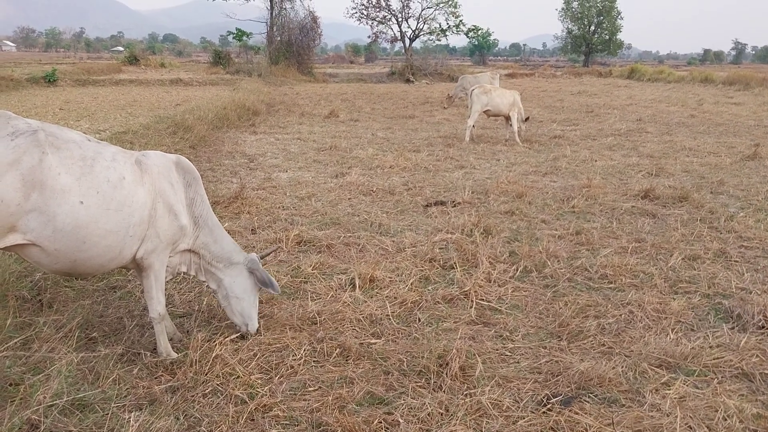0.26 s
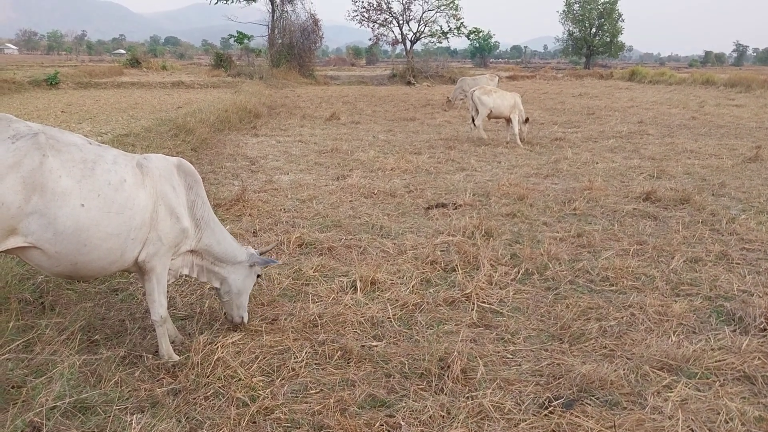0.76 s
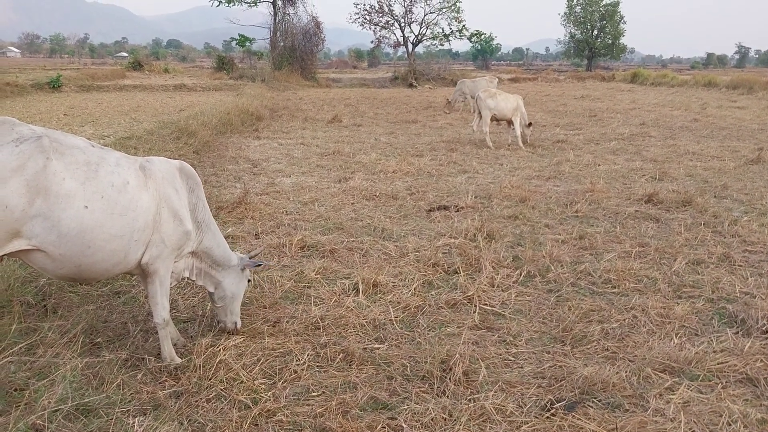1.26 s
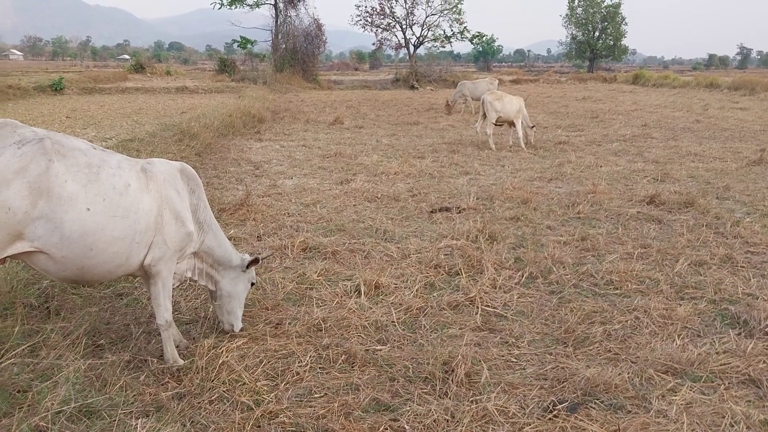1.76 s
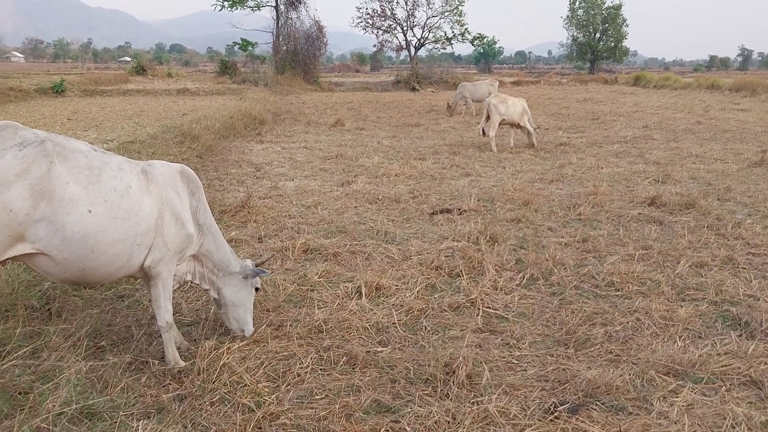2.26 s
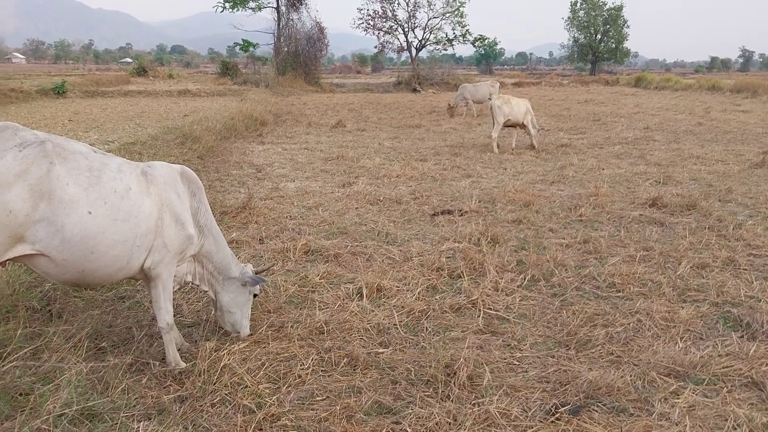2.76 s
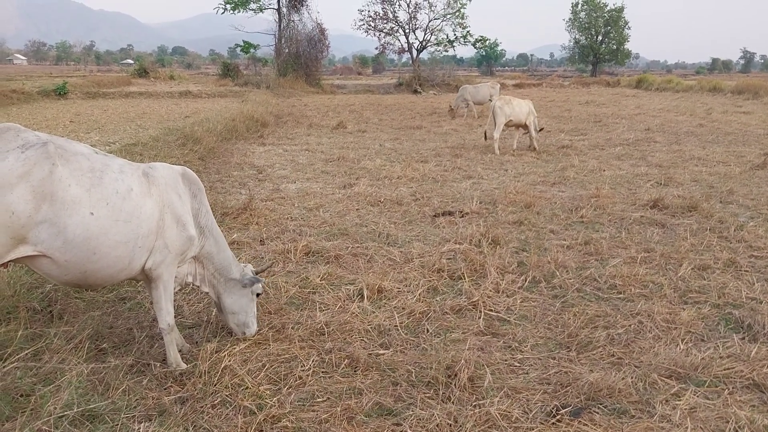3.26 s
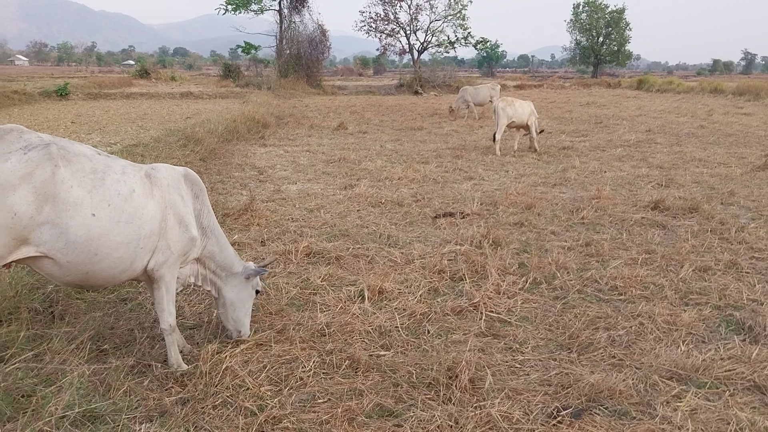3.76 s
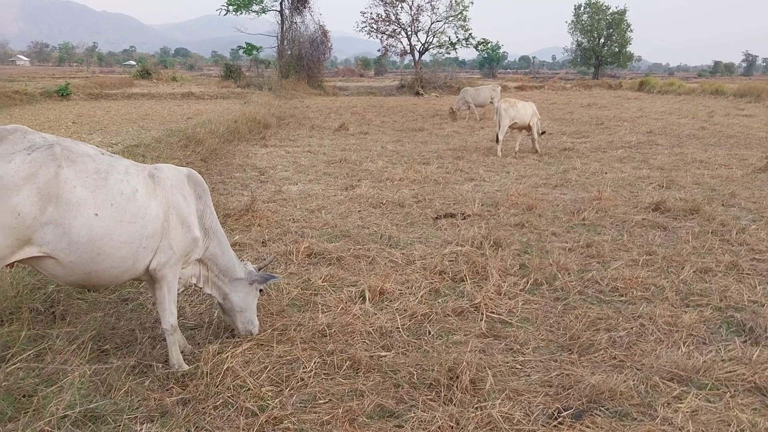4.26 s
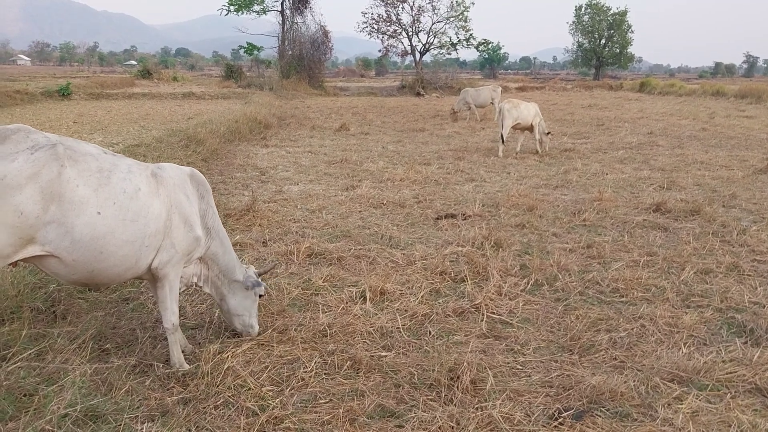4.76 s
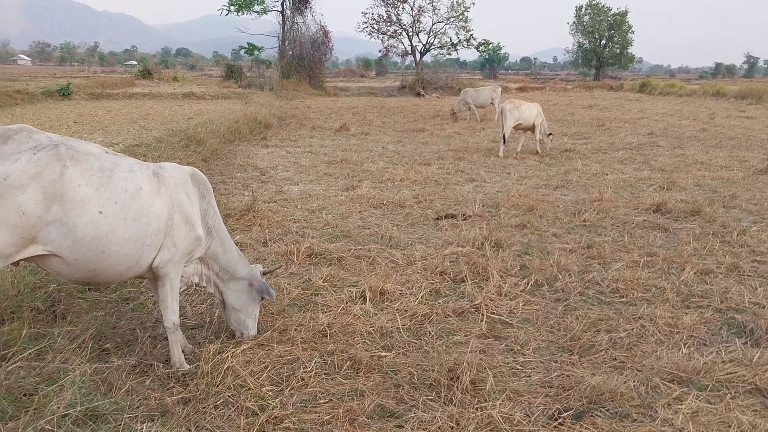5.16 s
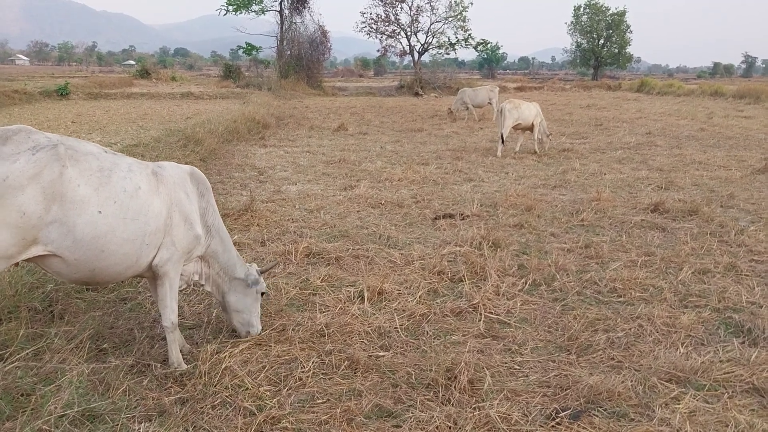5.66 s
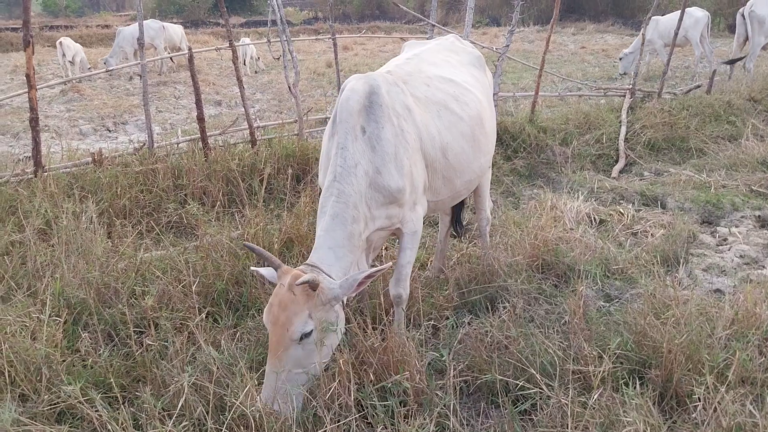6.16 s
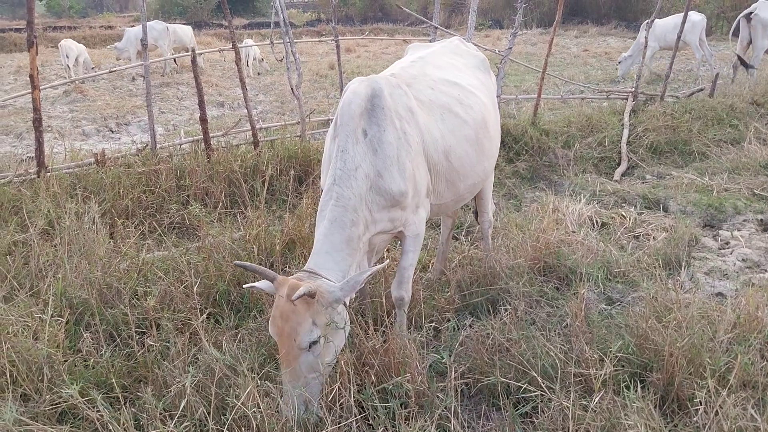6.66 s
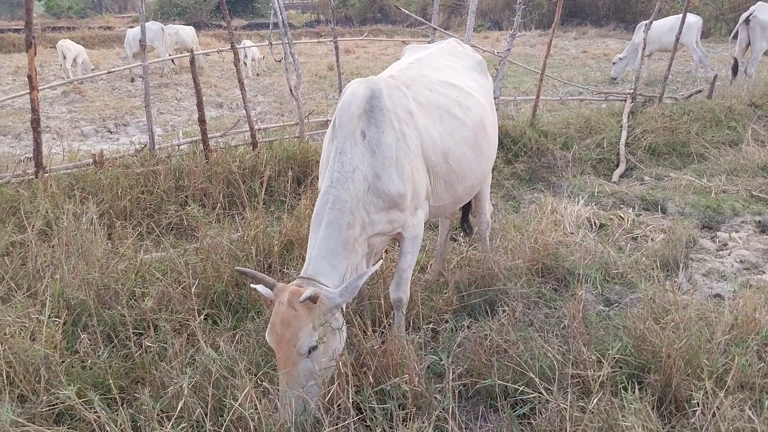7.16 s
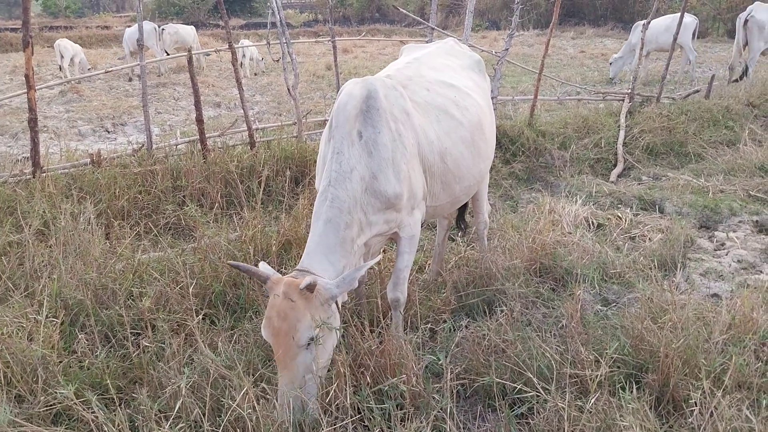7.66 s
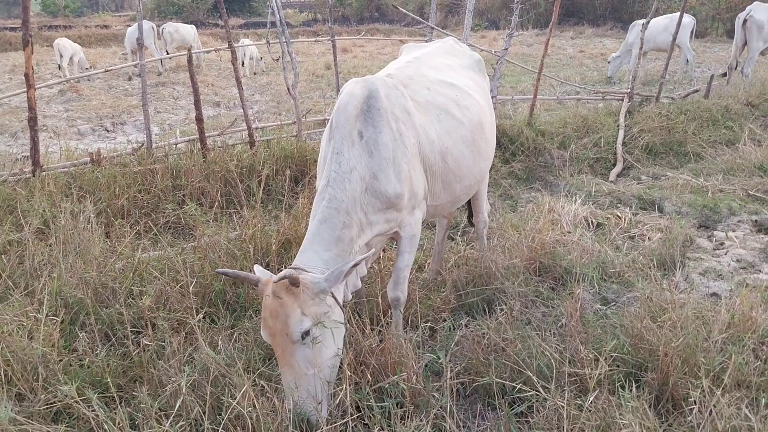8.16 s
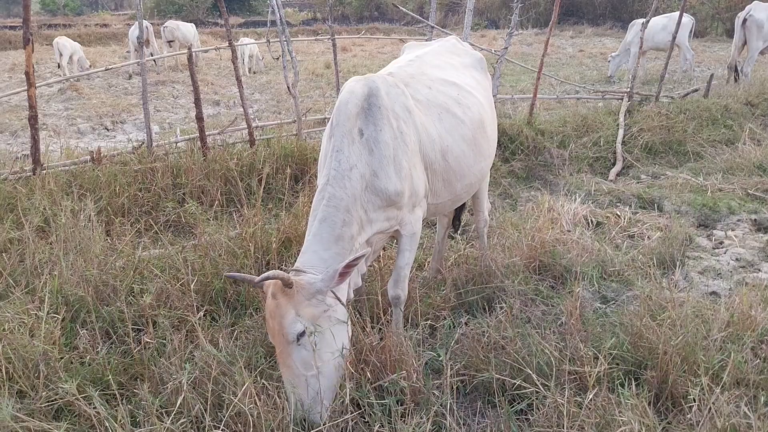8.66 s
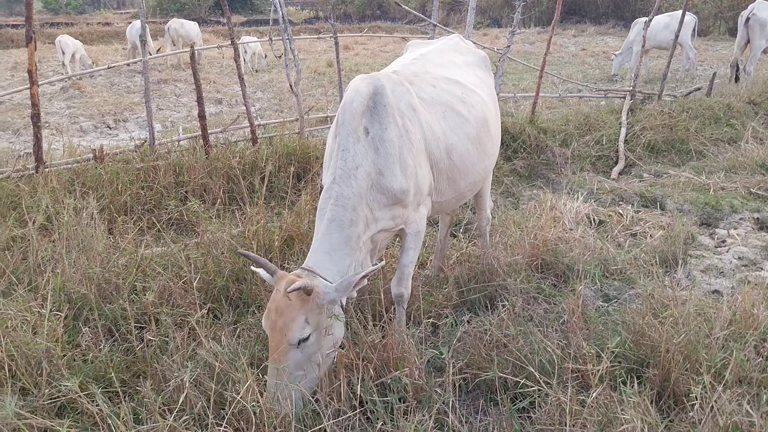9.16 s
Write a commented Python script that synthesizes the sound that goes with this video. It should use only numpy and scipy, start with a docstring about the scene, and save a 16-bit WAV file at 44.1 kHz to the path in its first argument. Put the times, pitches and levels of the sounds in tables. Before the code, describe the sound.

Gusty low wind blows across a handheld stereo microphone for the first six seconds, half covering a cow's faint tugs at dry stalks, small bell clanks and far bird whistles. Then the wind abruptly drops away; ripping tufts, dry rustle, sharp twiggy snaps and a tinny neck bell come close and clear, with a few late bird notes.

```python
"""Grazing cow in wind

A cow grazes dry grass near a phone: jaws tear tufts (runs of fibre breaks ringing in the muzzle), stalks
rustle (hiss and grains) and snap (decaying splinter noise), a sheet-metal neck bell clanks (struck modes).
Wind buffets both ports (gusted noise, low thumps); a far bird whistles falling notes (pitch-swept sines).
Grazing is first some steps away in the open; after a cut at 5.81 s it is close by, in calmer air.
"""
import sys
import numpy as np
from scipy import signal
from scipy.fft import rfft, irfft, next_fast_len
from scipy.io import wavfile
from scipy.ndimage import uniform_filter1d, map_coordinates

SR = 44100
rng = np.random.default_rng(int(sys.argv[2]) if len(sys.argv) > 2 else 0)


def dump_mix(stems):
    """Bounce the given channels to the path in sys.argv[1] as a 16-bit WAV at rate SR."""
    frames = np.atleast_2d(stems).T  # one column per channel
    limited = np.clip(frames, -1, 1)  # hard clip at full scale
    pcm = np.round(limited * 32767).astype(np.int16)
    wavfile.write(sys.argv[1], SR, pcm)


N = 414981

# All table levels are relative: layer gains follow.
# Open-field wind strength: t/s, level/dB
OPEN_WIND = [(0.0, -37.5), (0.04, -36), (0.12, -38.5), (0.24, -50), (0.28, -40), (0.35, -38.5), (0.39, -49),
             (0.46, -49), (0.51, -31), (0.55, -36), (0.6, -30), (0.66, -40), (0.8, -43), (0.88, -37),
             (0.96, -46), (1.02, -44.5), (1.1, -34), (1.17, -27.5), (1.22, -37), (1.3, -36), (1.41, -34.5),
             (1.5, -27.5), (1.55, -35), (1.64, -31), (1.8, -36), (2.0, -40), (2.06, -37), (2.16, -47),
             (2.21, -34.5), (2.3, -42), (2.39, -33), (2.42, -25), (2.52, -30), (2.55, -28.5), (2.63, -45),
             (2.75, -46), (2.9, -42), (2.98, -46), (3.06, -36), (3.15, -43), (3.25, -38), (3.35, -43),
             (3.57, -33.5), (3.77, -49), (3.82, -38), (3.88, -36), (3.94, -29), (4.05, -29), (4.17, -44),
             (4.23, -38), (4.28, -34), (4.42, -53), (4.52, -35), (4.6, -44), (4.7, -48), (4.79, -40),
             (4.85, -51), (4.9, -47), (4.96, -57), (5.04, -40), (5.18, -39), (5.25, -51), (5.29, -42),
             (5.37, -55), (5.43, -45), (5.48, -52), (5.58, -38.5), (5.66, -42.5), (5.73, -48), (5.8, -39),
             (5.84, -80.5)]
# Hardest eddies: t/s, peak level/dB, upper edge f/Hz
HARD_EDDIES = [(1.157, -17, 238), (1.356, -21.5, 226), (1.45, -21.5, 512), (1.501, -18, 600),
               (1.655, -23, 382), (2.415, -17.5, 520), (2.474, -17.5, 400), (2.540, -7.5, 255),
               (3.003, -29, 420), (3.295, -29, 620), (3.965, -11, 325), (4.031, -18, 300),
               (4.062, -15, 402), (4.53, -25, 248), (5.120, -20, 257), (5.798, -27.5, 335),
               (7.405, -32.5, 276), (7.466, -34, 336)]
# Muzzle pushing through stalks: t/s, rustle level/dB
RUSTLE_LEVEL = [(0, -58), (.3, -55.5), (.95, -57), (2.28, -55), (3.38, -57.5), (3.8, -54.5), (4.4, -60.5),
                (5.13, -57.5), (5.76, -59.5), (5.88, -52), (6.75, -59.5), (7.1, -55.5), (7.8, -57.5),
                (8.62, -56.5), (8.96, -48.5), (9.35, -57.5)]
# Tufts torn off: t/s, peak level/dB, brightness/(dB/octave)
TUFT_TEARS = [(0.474, -41.5, 1.5), (0.627, -33.5, -12), (0.805, -38, 7), (1.018, -41, -1.5),
              (1.649, -38.5, -18), (2.531, -31.5, -4.5), (2.721, -38.5, -2), (2.874, -42, 5),
              (3.656, -42, 12), (4.109, -42, 1.5), (4.309, -40.5, -9), (4.768, -40, -6), (4.88, -39, 5),
              (4.917, -42, 3), (5.008, -43, 0), (5.046, -36, -3), (5.279, -38.5, -1), (5.812, -40, -3),
              (5.972, -28, 6), (6.022, -40.5, 5), (6.137, -31, 5.5), (6.157, -33, 0), (6.178, -31, 1),
              (6.354, -41, 7), (6.376, -28.5, 3.5), (6.385, -29.5, 2), (6.534, -35.5, -1), (6.557, -31, 2),
              (6.857, -48, 8), (7.072, -40, 0), (7.112, -43, 0.5), (7.296, -31.5, 5.5), (7.4, -38.5, -1.5),
              (7.461, -39, -15), (7.644, -49, 6.5), (7.903, -37.5, 4), (7.938, -32, 2), (8.395, -48, 3.5),
              (8.574, -47, 10), (8.709, -34, 4), (8.743, -38.5, -1), (8.874, -35, 7.5), (8.898, -31, 2),
              (8.945, -38.5, 7), (9.344, -46.5, 2.5)]
# Dry stalks breaking: t/s, peak level/dB
STALK_SNAPS = [(0.3252, -28.5), (3.6697, -29), (5.8082, -26.5), (5.8787, -25.5), (6.2064, -31),
               (6.4103, -35), (6.5883, -29), (6.609, -27), (7.028, -33), (7.164, -36), (7.219, -34),
               (7.402, -32), (7.463, -21), (8.84, -30), (8.863, -39), (8.888, -25), (8.955, -29),
               (9.013, -32.5), (9.203, -33)]
# Clapper blows: t/s, hum level/dB, main ring level/dB, other modes level/dB, favoured modes level/dB,
# then modes favoured by the contact spot, f/Hz, strongest first
CLAPPER_BLOWS = [(0.062, -52, -49, -57, -46, 6153, 5067, 3429, 5460),
                 (0.291, -52, -48, -54, -47, 6153, 5067, 3429, 10875),
                 (0.585, -54, -59, -61, -52, 6319, 4078), (0.823, -49, -49, -58, -53, 3015, 5460),
                 (1.094, -62, -51, -59, -54, 5460, 3603, 6153),
                 (1.221, -45.5, -41, -44, -32, 6153, 5460, 9598, 5067, 10875, 6319),
                 (1.283, -56, -49, -51, -38, 3603, 3429, 5067, 3015),
                 (1.388, -64, -51, -57, -49, 6319, 3882), (2.316, -65, -57, -57, -50, 5460, 6153),
                 (2.552, -65, -56, -56, -45.5, 5067, 6319, 5202), (2.787, -67, -60, -62, -52, 6319, 4078),
                 (3.466, -73, -56, -56, -45.5, 6153, 5460, 5067),
                 (3.667, -75.5, -52, -56.5, -46, 2425, 2635, 6319),
                 (3.897, -72, -55, -56, -46, 6319, 5067, 6153, 3429),
                 (4.532, -57, -48, -54, -42.5, 6319, 5460), (4.706, -54, -37.5, -49, -35, 6319, 3882, 5202),
                 (4.964, -52.5, -50.5, -58, -52.5, 6153, 5067, 7034),
                 (5.764, -59, -57, -58, -47.5, 6319, 6153), (5.9, -62, -48, -60, -55, 5202),
                 (6.487, -42.5, -32, -41, -36.5, 6153, 4078, 5202, 6319, 3882, 12965),
                 (6.936, -52, -41.5, -51, -39, 6153, 5460, 10875, 4078, 5202),
                 (7.323, -42, -38.5, -37.5, -33, 6153, 10875, 5067, 5460, 12965, 7811),
                 (8.871, -48, -35, -38.5, -29.5, 10970, 6153, 5202, 7034, 14410, 5460),
                 (8.925, -43, -37.5, -39.5, -31.5, 6153, 5460, 3603, 10875, 3882),
                 (9.384, -39.5, -50, -39, -27.5, 7034, 6319, 5460)]
# Bell falls against the dewlap and is choked: t/s
DEWLAP_CHOKES = [1.0, 1.55, 2.85, 3.55, 4.0, 5.35, 6.05, 6.99, 7.36, 9.16]
# Bell shell modes: f/Hz, level within hum or clang/dB, t60/s
BELL_MODES = [(1001, -10, .6), (1074, 0, 1.8), (2380, -15, .2), (2425, -7, .2), (2635, -7, .18),
              (2909, -4, .38), (3015, -3, .13), (3429, -6, .28), (3603, -9, .17), (3882, -5, .16),
              (4078, -8, .22), (5067, -5, .21), (5202, -10, .2), (5460, -8, .17), (6153, -6, .19),
              (6319, -5, .2), (7034, -11, .18), (7811, -11, .17), (8872, -8, .16), (9190, -8, .16),
              (9598, -7, .16), (10875, -3, .16), (10970, -4, .14), (12550, -8, .13), (12965, -4, .18),
              (13520, -11, .13), (14410, -9, .17), (14800, -7, .12), (15400, -8, .12)]
# Resonances of mouth and muzzle: f/Hz, width/Hz, level/dB
MUZZLE_MODES = [(752, 101, 2.5), (854.5, 62, 5), (1167, 45, -5), (1272, 34, -2.5), (1815, 55, -2.5),
                (2383, 75, -0.5), (2630, 170, -14), (3085, 140, -13), (3980, 140, -18), (4506, 130, -14),
                (5400, 200, -24)]
# Bird whistles: t/s, length/s, start f/Hz, end f/Hz, lateness of fall (1 = even), hoarseness (0-1), level/dB
BIRD_NOTES = [(.21, .15, 2150, 1945, 1.2, .04, -57.5), (.47, .15, 2305, 2070, 1.2, .04, -51.5),
              (.58, .15, 2360, 2070, 1.2, .04, -55.5), (.63, .15, 2550, 2200, 1.2, .15, -65),
              (1.6, .14, 2424, 2120, 1, .03, -52), (1.735, .135, 2170, 1910, 1.1, .03, -55),
              (2.299, .15, 2920, 2530, 1.2, .8, -58), (3.14, .15, 3300, 2810, 1.2, 1, -62),
              (3.268, .125, 2360, 2260, 2.5, .03, -53), (3.43, .18, 2180, 1900, 1.5, .03, -50),
              (4.4, .13, 2620, 2320, 1.2, .03, -56), (4.44, .08, 5100, 4550, 1, .03, -63),
              (4.995, .15, 2710, 2380, 1.2, .3, -57), (5.47, .15, 2290, 1920, 1.2, .04, -60.5),
              (7.975, .12, 2385, 2240, 7, .03, -48.5), (8.11, .13, 3480, 3000, 1.2, 1, -64),
              (8.23, .11, 2560, 2320, 1.2, .8, -54), (8.44, .15, 4000, 3650, 1.2, 1, -66),
              (8.59, .15, 2670, 2560, 1.2, .4, -57)]
# Spectrum of strong-wind rumble: f/Hz, level/dB
RUMBLE_SPECTRUM = [(15, -46), (30, -8.5), (60, -1), (105, 3.5), (190, -0.5), (260, -12.5), (400, -51),
                   (700, -73)]
# Spectrum of light-air rumble: f/Hz, level/dB
LULL_SPECTRUM = [(15, -10), (30, -14), (60, 1.5), (105, 0), (150, -12.5), (220, -15.5), (400, -33),
                 (700, -68)]
# Spectrum of higher wind flutter: f/Hz, level/dB
FLUTTER_SPECTRUM = [(100, -12.5), (180, 1), (245, 3), (370, -3), (530, -14.5), (690, -25.5), (900, -31),
                    (1300, -62.5), (3000, -100)]
# Spectrum of rubbing straw: f/Hz, level/dB
STRAW_SPECTRUM = [(300, -4), (1000, -26), (2000, -21.5), (3400, -6), (5500, -1.5), (7400, -3), (8300, -4.5),
                  (10000, -2.5), (11300, 2.5), (13000, 1), (15800, -1)]
# Spectrum of steady field air: f/Hz, level/dB
FIELD_SPECTRUM = [(20, 4), (70, -9.5), (200, -20.5), (500, -0.5), (1000, -2), (2300, 5), (4000, -3.5),
                  (9000, -16), (16000, -29)]
# Spectrum of fibre crackle: f/Hz, level/dB
CRACKLE_SPECTRUM = [(250, -28), (600, -3.5), (3200, 2.5), (5400, -4.5), (7000, -18), (15000, -20)]
# Side the wind strikes: t/s, left minus right level/dB
WINDWARD_SIDE = [(0, 11.5), (.6, 1.5), (1.7, 12.5), (2.5, 3.5), (3.3, 12), (4.06, 4), (4.9, 11), (6.4, 5),
                 (8.9, -10)]
# Flutter over rumble at usual strength: t/s, level/dB
FLUTTER_RATIO = [(0, -2.5), (.35, -11.5), (.6, -9), (1.0, -11), (1.85, 5.5), (2.2, -9.5), (2.8, -7.5),
                 (3.2, 7), (3.55, -3.5), (4.0, -1.5), (4.85, -5.5), (5.7, 6), (6.0, -15)]
# Puffs reaching the shelter: peak t/s, length/s, level/dB
SHELTER_PUFFS = [(6.1, 0.14, -51), (6.561, 0.11, -50), (6.89, 0.054, -56.5), (7.032, 0.093, -44.5),
                 (7.456, 0.16, -45.5), (7.759, 0.07, -47.5), (8.294, 0.14, -42.5), (8.738, 0.079, -44),
                 (8.898, 0.11, -44), (9.284, 0.16, -64)]

CLOSE_S = 5.81  # cut from the open field to close, sheltered grazing
TOP_HZ = 15900
USUAL_WIND_DB, FLUTTER_DB_PER_DB = -39, .35  # usual strength; flutter growth per dB above it
CALM_DB, PUFF_EDGE_DB = -79.5, 10  # air between puffs; drop from a puff's peak to its ends
NIBBLES_PER_S, NIBBLE_DB, NIBBLE_BRIGHT_DB_PER_OCT = 3, -55, 0.5  # faint tugs at random times
TWIGS_PER_S, TWIG_DB = 2, -54  # fainter snaps, close by only
RING_HZ, HUM_BELOW_HZ, HUM_SWELL_S = 2909, 1500, 0.01
LEAD_STEP_DB = 2.2  # each favoured mode under the one before
PORT_SIDE = np.array([[-.5], [.5]])  # left, right


def amp(db):
    """Decibels to gain."""
    return 10 ** (np.asarray(db) / 20)


def unit(x):
    """Scale to rms 1."""
    return x / np.sqrt(np.mean(x ** 2) + 1e-20)


def curves(rows):
    """One value per sample for each column after the time."""
    t_s, *cols = np.transpose(rows)
    return [np.interp(np.arange(N) / SR, t_s, c) for c in cols]


def wobble(knots_per_s):
    """Smooth random curve."""
    knots = rng.standard_normal(int(N * knots_per_s / SR) + 4)
    return map_coordinates(knots, [np.arange(N) * knots_per_s / SR])


def chance_times(per_s, start_s):
    """Random moments from start_s to the end."""
    return rng.uniform(start_s, N / SR, max(round(per_s * (N / SR - start_s)), 0))


def filtered(x, response):
    """x times a complex response of frequency."""
    n = x.shape[-1]
    m = next_fast_len(n + 4096)
    return irfft(rfft(x, m) * response(np.fft.rfftfreq(m, 1 / SR)), m)[..., :n]


def coloured(x, spectrum):
    """x shaped by (Hz, dB) points, at rms 1."""
    f_hz, db = np.transpose(spectrum)
    return unit(filtered(x, lambda hz: amp(np.interp(np.log(hz + 1), np.log(f_hz), db))))


def noise(spectrum):
    """Coloured noise, unrelated at the two ports."""
    return coloured(rng.standard_normal((2, N)), spectrum)


def placed(x, lag_ms, right_db):
    """Offset between ports: positive lag is earlier, positive dB louder, at the right."""
    return amp(PORT_SIDE * right_db) * filtered(
        x, lambda hz: np.exp(2j * np.pi * hz * PORT_SIDE * lag_ms / 1000))


def add(track, t_s, x):
    """Mix x into the track from t_s."""
    start = max(round(t_s * SR), 0)
    part = track[:, start:start + x.shape[-1]]
    part += x[..., :part.shape[-1]]


def wind_strength_db():
    """Unbroken gusts in the open, then calm air with a few short puffs."""
    t = np.arange(N) / SR
    puffs = sum(amp(db - PUFF_EDGE_DB * np.abs(2 * (t - peak_s) / length_s) ** 1.35)
                for peak_s, length_s, db in SHELTER_PUFFS)
    sheltered_db = 20 * np.log10(amp(CALM_DB) + puffs)
    return np.where(t < OPEN_WIND[-1][0], curves(OPEN_WIND)[0], sheltered_db)


def wind(lumpy_db, own_db, rumble_db, flutter_db, top_db):
    """Turbulent lumps differ from port to port; light air is deep, stronger gusts flutter higher."""
    strength_db = wind_strength_db()
    windward_db = -PORT_SIDE * curves(WINDWARD_SIDE)[0]
    lumps_db = lumpy_db * wobble(45) + own_db * np.array([wobble(60), wobble(60)])
    lumps = amp(np.minimum(lumps_db, top_db))
    # crossfade light to strong air by half-second mean strength
    force = np.clip((uniform_filter1d(strength_db, SR // 2) + 51) / 12, 0, 1)
    air = np.sqrt(force) * noise(RUMBLE_SPECTRUM) + np.sqrt(1 - force) * noise(LULL_SPECTRUM)
    ratio = amp(curves(FLUTTER_RATIO)[0] + FLUTTER_DB_PER_DB * (strength_db - USUAL_WIND_DB))
    rumble = amp(rumble_db + windward_db) * unit(lumps * air)
    flutter = amp(flutter_db) * ratio * unit(lumps * noise(FLUTTER_SPECTRUM))
    return amp(strength_db) * (rumble + flutter) / np.hypot(1, ratio)


def field_air(level_db, right_db):
    """Steady broadband air, unrelated at the ports."""
    return amp(level_db) * noise(FIELD_SPECTRUM) * amp(PORT_SIDE * right_db)


def straw(level_db, grain_share, grains_per_s, grain_db, right_db):
    """Dry stalks rub: a fine hiss with countless tiny crackles in it."""
    rustle_db, = curves(RUSTLE_LEVEL)
    hits = (rng.random((2, N)) < grains_per_s / SR) * rng.choice([-1, 1], (2, N))
    grains = hits * amp(grain_db * np.minimum(rng.exponential(size=(2, N)), 5))
    share = np.clip(grain_share, 0, 1)
    hiss = np.sqrt(1 - share) * noise(STRAW_SPECTRUM)
    rub = hiss + np.sqrt(share) * coloured(grains, STRAW_SPECTRUM)
    return amp(rustle_db + level_db + 1.67 * wobble(32)) * rub * amp(PORT_SIDE * right_db)


def time_past_next(times_s, strike_s, t):
    """Seconds since the first of times_s after the strike, 0 before it."""
    next_s = min([s for s in times_s if s > strike_s], default=np.inf)
    return np.maximum(strike_s + t - next_s, 0)


def bell(level_db, chance_db, port_db, right_db, choke_db_per_s, restrike_db_per_s, tick_db, rise_s,
         splash_db, splash_t60_s):
    """Each blow damps the old ring and wakes a new blend of shell modes; high modes splash at contact."""
    out, t = np.zeros((2, N)), np.arange(SR) / SR
    hz, mode_db, t60_s = np.transpose(BELL_MODES)
    clang = (hz > HUM_BELOW_HZ).astype(int)
    modes = amp(-60 * t / t60_s[:, None]) * np.exp(2j * np.pi * hz[:, None] * t)
    modes[hz < HUM_BELOW_HZ] *= 1 - np.exp(-t / HUM_SWELL_S)
    strikes_s = [row[0] for row in CLAPPER_BLOWS]
    for strike_s, hum_db, ring_db, rest_db, lead_db, *favoured_hz in CLAPPER_BLOWS:
        clang_db = rest_db + chance_db * rng.standard_normal(len(hz))
        size = amp(mode_db + np.where(clang, clang_db, hum_db))
        size[hz == RING_HZ] = amp(ring_db)
        for rank, f_hz in enumerate(favoured_hz):
            size[np.abs(hz - f_hz).argmin()] = amp(lead_db - LEAD_STEP_DB * rank)
        # high modes radiate in lobes: random port phase; hum phase only differs before and after the cut
        hum_phase_rad = 2.2 if strike_s < CLOSE_S else -.3
        lobes_rad = np.where(clang, rng.uniform(-np.pi, np.pi, len(hz)), hum_phase_rad)
        phase_rad = rng.uniform(0, 2 * np.pi, len(hz)) + PORT_SIDE * lobes_rad
        balance_db = right_db + port_db * rng.standard_normal(len(hz))
        ports = amp(PORT_SIDE * balance_db) * np.exp(1j * phase_rad)
        scattered = clang * np.exp(2j * np.pi * rng.random(len(hz)))
        splash_gain = amp(lead_db + splash_db - 60 * t / splash_t60_s)
        splash = splash_gain * ((scattered * ports) @ modes).real
        ring = (((size * ports) @ modes).real + splash) * (1 - np.exp(-t / rise_s))
        tick = amp(lead_db + tick_db - 60 * t / 0.03) * rng.standard_normal((2, len(t)))
        damping_db = (choke_db_per_s * time_past_next(DEWLAP_CHOKES, strike_s, t)
                      + restrike_db_per_s * time_past_next(strikes_s, strike_s, t))
        add(out, strike_s - rise_s, amp(level_db - damping_db) * (ring + tick))
    return out


def field_echo(x, t60_s):
    """Ground and hedges scatter a short, thin answer."""
    t = np.arange(SR // 3) / SR
    tail = rng.standard_normal((2, len(t))) * amp(-60 * t / t60_s)
    return signal.fftconvolve(x, tail / np.linalg.norm(tail[0]), axes=1)[:, :N]


def bird(level_db, rasp_hz, trill_hz, round_off):
    """Thin whistles fall in pitch, some late; hoarse ones break into a fast, uneven trill."""
    out = np.zeros((2, N))
    for start_s, length_s, start_hz, end_hz, lateness, hoarse, db in BIRD_NOTES:
        u = np.linspace(0, 1, int(length_s * SR))
        trill = np.sin(2 * np.pi * trill_hz * length_s * u + rng.uniform(0, 2 * np.pi))
        jitter = unit(uniform_filter1d(rng.standard_normal(SR // 2), 60))[:len(u)]
        shake = 0.8 * trill + 0.28 * jitter
        hz = start_hz + (end_hz - start_hz) * u ** lateness + hoarse * rasp_hz * shake
        envelope = np.abs(np.sin(np.pi * u)) ** round_off
        whistle = np.sin(2 * np.pi * np.cumsum(hz) / SR)
        add(out, start_s, amp(db + level_db) * envelope * whistle)
    return placed(out, lag_ms=-0.57, right_db=4.0)


def snaps(level_db, t60_s):
    """A stalk breaks with a short, splintery crack: uneven noise dying away."""
    out, t = np.zeros((2, N)), np.arange(SR // 12) / SR
    twigs = [(s, TWIG_DB) for s in chance_times(TWIGS_PER_S, CLOSE_S)]
    spectrum = [(200, 3), (900, 2.5), (5000, 2.5), (8300, -0.5), (12000, 5), (16000, 10.5)]  # f/Hz, level/dB
    for snap_s, db in list(STALK_SNAPS) + twigs:
        uneven_db = 3.3 * rng.standard_normal(len(t))
        splinters = rng.standard_normal((2, len(t))) * amp(uneven_db - 60 * t / t60_s)
        crack = coloured(splinters, spectrum)
        add(out, snap_s, amp(db + level_db) * crack / np.abs(crack).max())
    return out


def muzzle_response(hz, sizes):
    """Hollow ring of mouth and muzzle: resonances summed in alternating sign."""
    total = 0
    for k, (centre_hz, width_hz, db) in enumerate(MUZZLE_MODES):
        loss = 1j * hz * width_hz
        total = total + (-1) ** k * sizes[k] * amp(db) * loss / (centre_hz ** 2 - hz ** 2 + loss)
    return total


def tearing(level_db, spread_s, fibres_per_s, scatter, distant_db_per_oct, chance_db, crackle_db,
            bundles_per_s, bundle_db):
    """A tuft gives way bundle by bundle; its breaking fibres crackle and ring in the muzzle."""
    out, t = np.zeros((2, N)), np.arange(SR // 10) / SR
    nibbles = [(s, NIBBLE_DB, NIBBLE_BRIGHT_DB_PER_OCT) for s in chance_times(NIBBLES_PER_S, 0)]
    knots_s = np.arange(0, t[-1], 1 / bundles_per_s)
    for tear_s, db, bright_db_per_oct in list(TUFT_TEARS) + nibbles:
        far = tear_s < CLOSE_S
        breaks = (rng.random(len(t)) < fibres_per_s / SR) * rng.standard_normal(len(t))
        bundles_db = bundle_db * rng.standard_normal(len(knots_s))
        bundles_db[0] = bundle_db
        breaks[0] = 1.78  # always a firm first break
        breaks *= amp(np.interp(t, knots_s, bundles_db))
        run = (breaks + scatter * rng.standard_normal((2, len(t)))) * np.exp(-(t / spread_s) ** 2)
        gape = 1 + 0.0087 * rng.standard_normal()  # shifts all resonances
        sizes = amp(chance_db * rng.standard_normal(len(MUZZLE_MODES)))
        tilt_db_per_oct = bright_db_per_oct + (distant_db_per_oct if far else 0)

        def mouth(hz):
            octaves = np.log2(np.clip(hz, 700, 5000) / 1500)
            return muzzle_response(hz * gape, sizes) * amp(tilt_db_per_oct * octaves)

        crackle = amp(crackle_db + tilt_db_per_oct / 2) * coloured(run, CRACKLE_SPECTRUM)
        tear = unit(filtered(run, mouth)) + crackle
        lag_ms, right_db = (0.48, 7.5) if far else (0.047, 3.0)
        tear = placed(tear, lag_ms, right_db)
        add(out, tear_s, amp(db + level_db) * tear / np.abs(tear).max())
    return out


def eddies(level_db, life_s, left_db):
    """A hard eddy thumps the ports with a few low swings of pressure."""
    out, t = np.zeros((2, N)), np.arange(SR // 10) / SR
    for eddy_s, db, edge_hz in HARD_EDDIES:
        push = rng.standard_normal((2, len(t))) * t / life_s * np.exp(-t / life_s)
        band = signal.butter(6, [edge_hz / 4, edge_hz], "band", fs=SR, output="sos")
        thump = signal.sosfilt(band, push)
        add(out, eddy_s - 2 * life_s, amp(db + level_db) * thump / np.abs(thump).max())
    return out * amp(-PORT_SIDE * left_db)


def scene():
    """Cow and bird with their echoes, wind over all."""
    gusts = wind(lumpy_db=3.0, own_db=3.0, rumble_db=2.0, flutter_db=1.5, top_db=6)
    air = field_air(level_db=-67.5, right_db=3)
    grass = straw(level_db=3.5, grain_share=0.19, grains_per_s=1200, grain_db=5, right_db=1)
    cow = bell(level_db=-1, chance_db=3.5, port_db=1.5, right_db=4, choke_db_per_s=180,
               restrike_db_per_s=400, tick_db=-1, rise_s=.001, splash_db=-13, splash_t60_s=.12)
    song = bird(level_db=-0.3, rasp_hz=370, trill_hz=48.4, round_off=.55)
    cow = cow + snaps(level_db=3, t60_s=0.05)
    cow = cow + tearing(level_db=2, spread_s=0.014, fibres_per_s=1200, scatter=0.07,
                        distant_db_per_oct=-3.0, chance_db=3.0, crackle_db=-10,
                        bundles_per_s=450, bundle_db=4.5)
    gusts = gusts + eddies(level_db=-3.0, life_s=0.00395, left_db=1.0)
    echo = amp(-12) * field_echo(cow, t60_s=0.26) + amp(-8.5) * field_echo(song, t60_s=0.4)
    return cow + song + echo + grass + gusts + air


def record(dry):
    """The phone keeps nothing above its band limit."""
    return filtered(dry, lambda hz: hz < TOP_HZ)


dry = scene()
out = record(dry)
dump_mix(out)
```